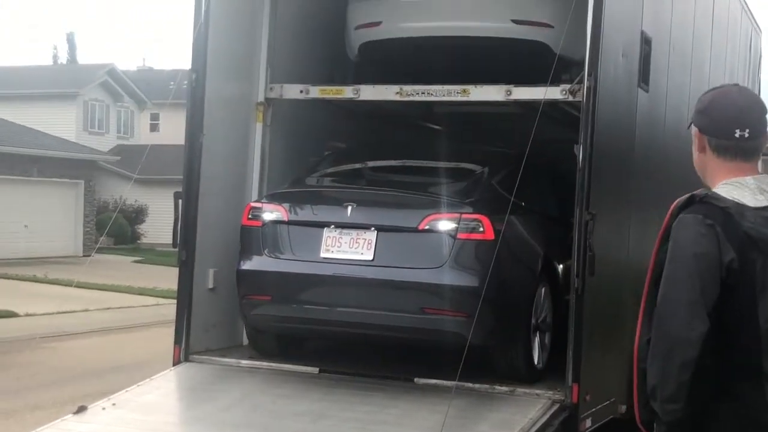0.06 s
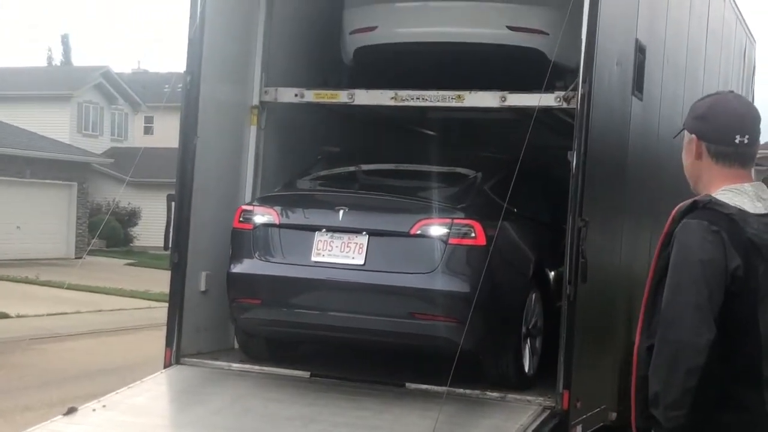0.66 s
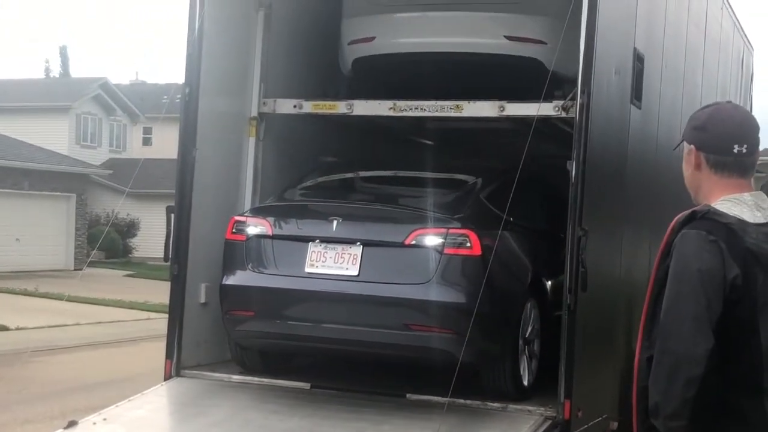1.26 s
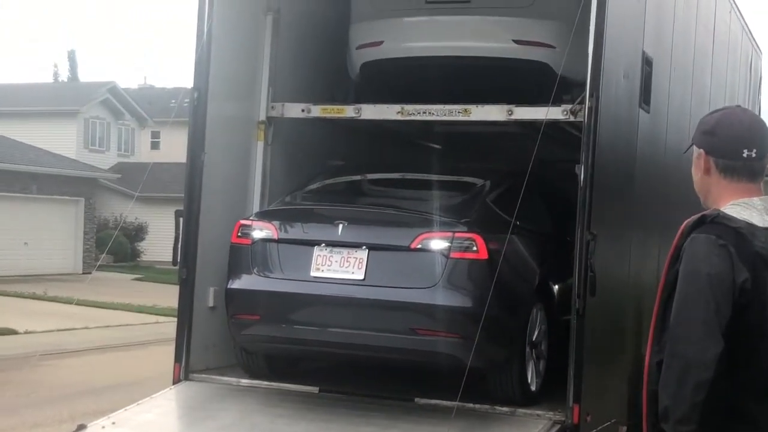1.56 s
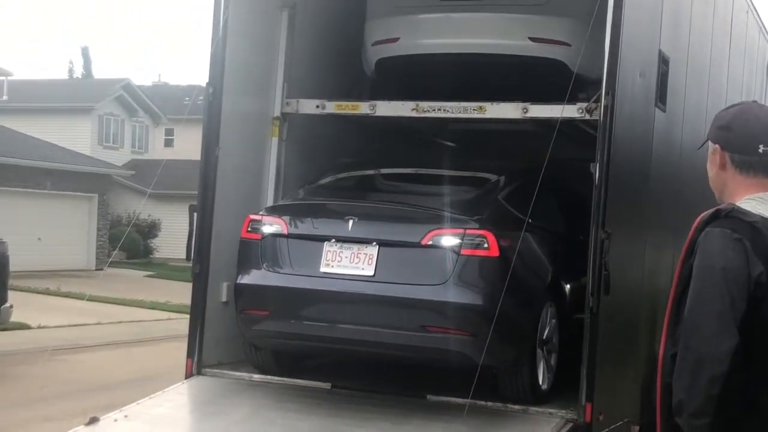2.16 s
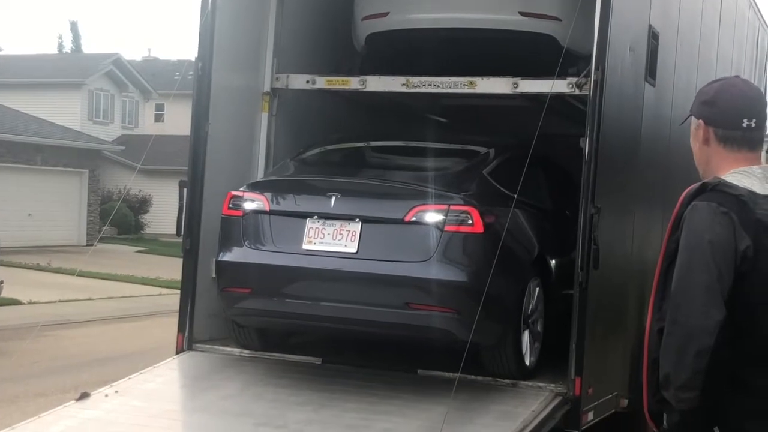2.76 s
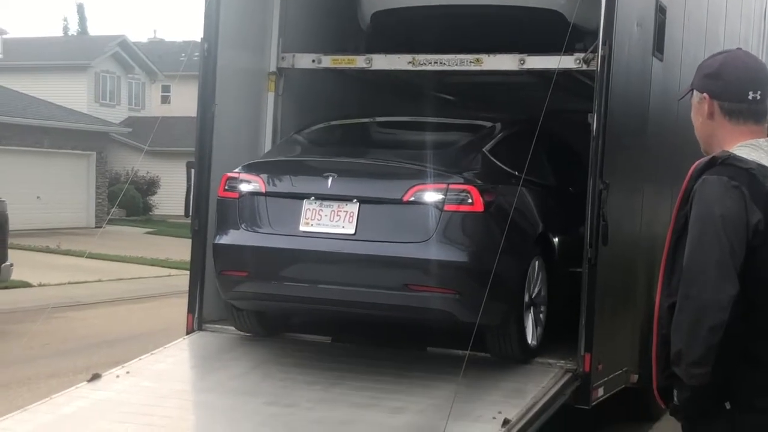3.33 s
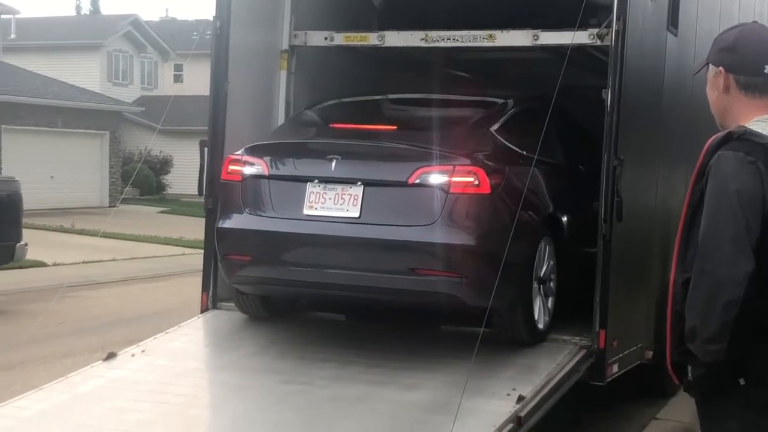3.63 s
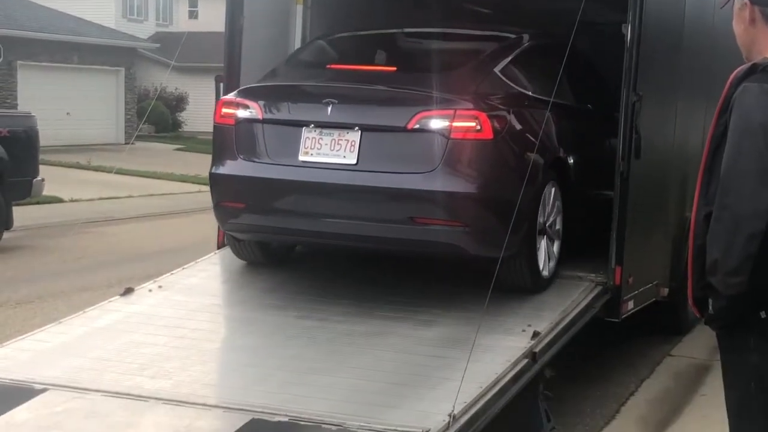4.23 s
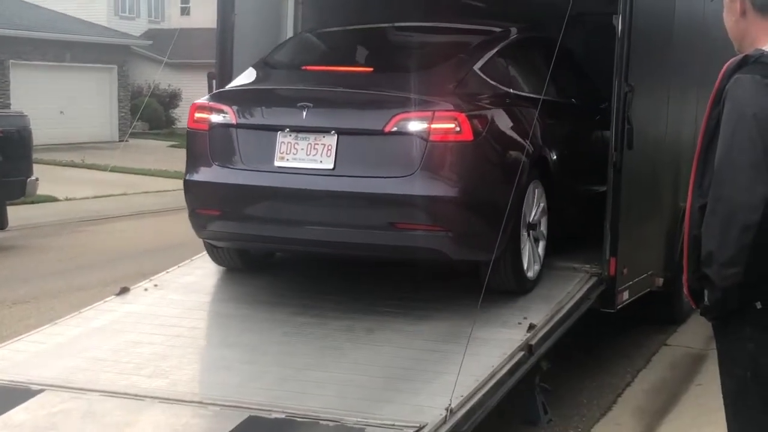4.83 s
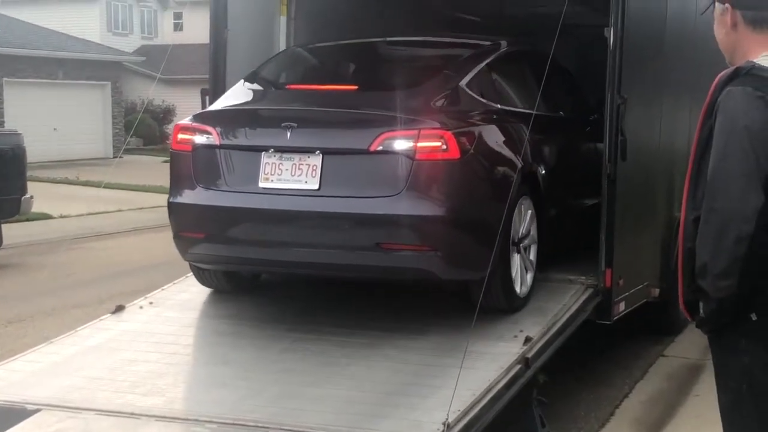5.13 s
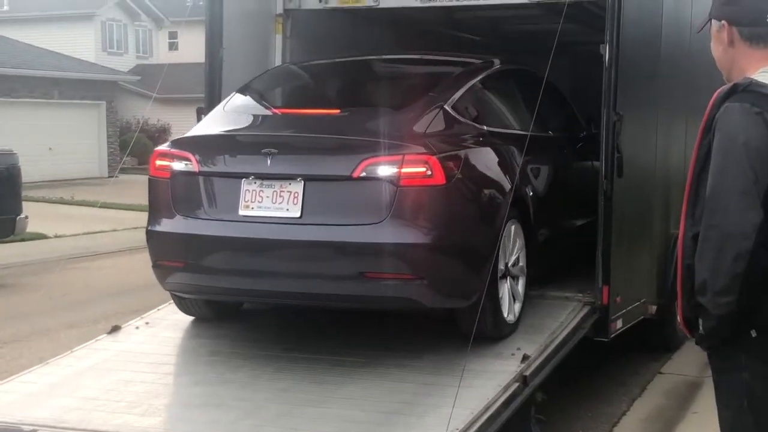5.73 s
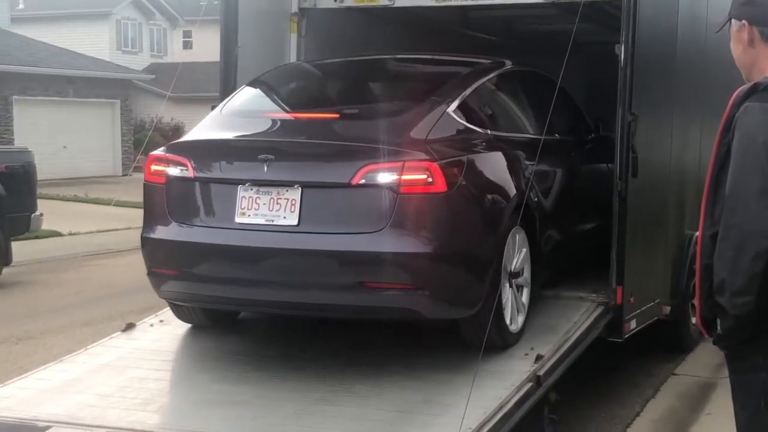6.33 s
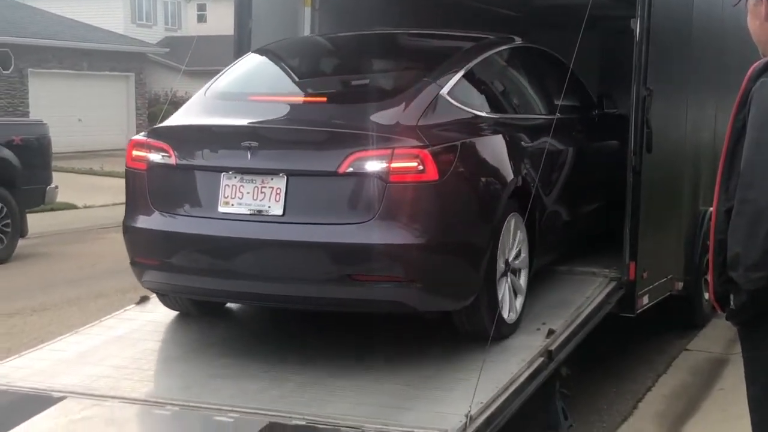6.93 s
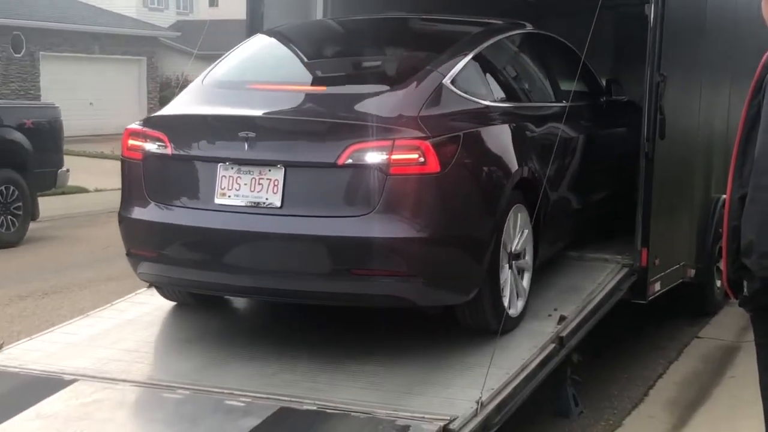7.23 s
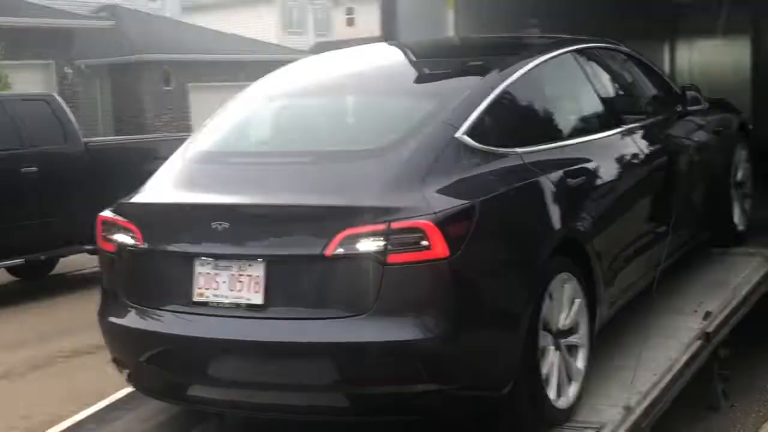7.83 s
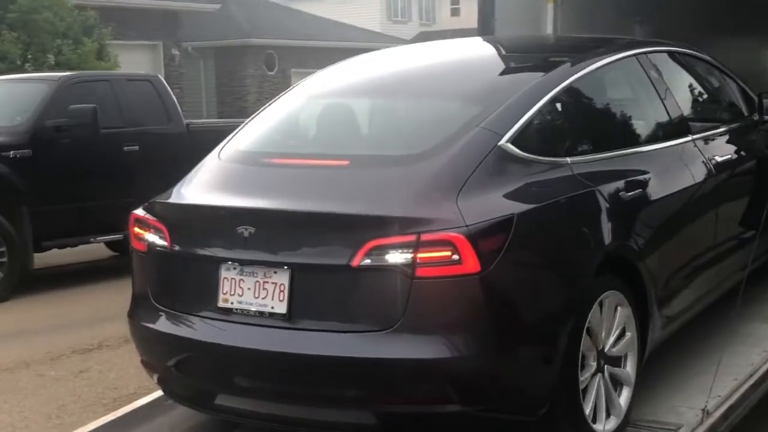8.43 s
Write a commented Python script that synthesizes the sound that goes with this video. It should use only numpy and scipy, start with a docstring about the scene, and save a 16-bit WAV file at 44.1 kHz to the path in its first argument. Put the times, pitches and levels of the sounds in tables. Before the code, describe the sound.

Heard from beside an open trailer, soft creaks, ticks and rubber scuffs give way to sharp clanks of steel fittings as a car rolls onto the metal ramp. The panels crack and pop loudly at irregular moments, each with a short hollow ring. The snaps thin out, and a last clank and some scuffs follow. Low rolling rumble, a very faint electric whine and distant traffic lie underneath.

```python
"""On a quiet street, an electric car backs slowly out of an enclosed trailer and down its metal ramp.
Under the load the ramp's panels slip and snap, the deck flexes with dull thuds and steel fittings clank:
each impact excites modes that decay exponentially. Friction makes the floor creak and the tyres scuff
and squeak, while rolling contact rumbles on the deck and pops grit. The hollow trailer reverberates
after every blow, over the faint whine of the drive and the murmur of distant traffic."""
import sys
import numpy as np
from scipy import signal
from scipy.fft import rfft, irfft
from scipy.io import wavfile
from scipy.ndimage import map_coordinates

SR = 44100
rng = np.random.default_rng(int(sys.argv[2]) if len(sys.argv) > 2 else 0)


def unload_audio(sound):
    """Save the sound as a 16-bit wav file, at the path given as the first command line argument."""
    columns = np.transpose(np.atleast_2d(sound))
    # keep every value between -1 and 1, then stretch to whole-number steps
    steps = np.round(np.clip(columns, -1, 1) * 32767)
    wavfile.write(sys.argv[1], SR, steps.astype(np.int16))


N = 382788
T = np.arange(int(.7 * SR)) / SR  # time axis of one event, t/s
HZ, SCENE_HZ = np.fft.rfftfreq(len(T), 1 / SR), np.fft.rfftfreq(N, 1 / SR)


# Snaps of the ramp: t/s, level/dB, relative crack level/dB, treble shelf/dB, resonance f/Hz
RAMP_SNAPS = [(4.1134, -20.5, -5, -1, 2430), (4.3283, -13.5, 3, -8.5, 2860), (4.4176, -12, -3, 1, 3140),
              (4.4875, -13.5, -6, 3, 2500), (4.7401, -13, 4, 0.5, 2910), (4.8689, -12, -1, 6, 1710),
              (4.935, -14.5, -6.5, 0, 2720), (5.181, -14.5, 0, 4, 2300), (5.2956, -14, -4, 9.5, 2490),
              (5.3928, -18.5, -5, -5, 2350), (5.6486, -14, -2, 5, 3020), (5.9712, -18.5, -22, 0.5, 2300),
              (6.2503, -17, -6, -0.5, 2730), (6.4156, -15, -6.5, -1.5, 2530), (6.582, -14.5, -3, 0, 2620),
              (7.3026, -16, 2.5, 9, 6840), (7.3762, -15, 0, 2, 3530), (7.5103, -21.5, -3, 5.5, 2520),
              (7.5312, -23, 2, 0, 1250)]
# Spectral envelope of a panel: f/Hz, level/dB
PANEL_SPECTRUM = [(88, -56), (150, -6.5), (264, 1), (494, -4), (1340, -1), (1630, -1.5), (1940, -3),
                  (3100, -2.5), (5910, -7.5), (7470, -16), (8730, -12.5), (11500, -22.5), (14500, -27),
                  (16000, -31)]
# Resonances of a panel: f/Hz, bandwidth/Hz, weight/dB
PANEL_RESONANCES = [(1520, 60, -7), (2880, 810, -5), (3600, 79, 5), (4220, 24, -25), (4540, 150, 10),
                    (5170, 170, -20), (5690, 130, 3), (6230, 110, -23), (8000, 95, -16), (8840, 240, 2),
                    (10500, 230, 5), (10600, 160, -3)]
# Decay time of a panel: f/Hz, T60/s
PANEL_T60 = [(200, 0.38), (600, 0.22), (1500, 0.097), (3000, 0.18), (6000, 0.095), (12000, 0.082)]

def snaps():
    """Impulsive excitation: a loaded panel slips with a crack, the plate rings and the deck booms."""
    out = np.zeros(N)
    spot_db, ring_db, boom_db = 8.5, -12.5, -31
    modes = sum(amp(db / 2) * resonance(hz, width) for hz, width, db in PANEL_RESONANCES)
    plate = amp(along(PANEL_SPECTRUM, HZ)) * (1 + 0.29 * modes)
    for s, db, crack_db, treble_db, hz in RAMP_SNAPS:
        bass_shelf = amp((-2 + 0.042 * crack_db) / (1 + (HZ / 1200) ** 4))
        colour = plate * treble(treble_db) * bass_shelf
        high_pass = HZ ** 2 / (HZ ** 2 + 1300 ** 2)
        crack = noise(colour * spot(hz, spot_db) * high_pass) * fade(t60=0.021, rise=0.0013)
        # the ring spreads through the whole plate, so the spot's own resonance matters less
        ring = ringing(colour * spot(hz, .5 * spot_db), PANEL_T60, rise_cycles=1.4)
        boom = noise(resonance(307, 134)) * fade(t60=0.21, rise=0.014)
        add(out, s, amp(db) * (amp(crack_db) * crack + amp(ring_db) * ring + amp(boom_db) * boom))
    return out


# Steel impacts: t/s, level/dB, treble shelf/dB, relative rattle level/dB, resonance f/Hz, boost/dB
FITTING_CLANKS = [(3.1887, -13.5, 4.5, -22.5, 3130, 13), (3.4137, -13.5, 4.5, -12.5, 3850, 10),
                  (3.461, -16, 9, -14.5, 3880, 15), (3.478, -20.5, 1, -10.5, 4400, -6),
                  (3.5659, -19.5, 3, -14, 3650, 10), (8.2815, -16.5, -1.5, -22, 1740, 22),
                  (8.3395, -26.5, -10, -15.5, 4500, 2)]
# Normal modes of a fitting: f/Hz, level/dB, T60/s
STEEL_MODES = [(1105, -5.5, 0.097), (1546, 1, 0.041), (3985, 7.5, 0.012), (4260, 1, 0.091),
               (4900, -18, .04), (5930, -4, .07), (7800, -17, .08), (8650, -2, .07), (10060, -21, 0.055)]
# Spectrum of steel striking steel: f/Hz, level/dB
CLASH_SPECTRUM = [(180, -57), (300, -25), (574, -3), (961, -22), (1120, -6), (1300, -9.5), (2280, -6.5),
                  (3950, -2), (5160, -3), (8790, -7), (16000, -17.5)]

def clanks():
    """Impact and rebound: steel meets steel and chatters twice, each contact exciting damped modes."""
    out = np.zeros(N)
    contact = amp(along(CLASH_SPECTRUM, HZ))
    for s, db, treble_db, rattle_db, hz, boost_db in FITTING_CLANKS:
        colour = contact * treble(treble_db) * spot(hz, boost_db, ripple_db=5.5)
        for delay, bounce_db in [(0, 1.5), (.004, -5.5), (.0098, -6.5)]:
            strengths = amp(rng.normal(0, 2, len(STEEL_MODES)))
            ring = np.zeros(len(T))
            for strength, (mode_hz, mode_db, t60) in zip(strengths, STEEL_MODES):
                mode = np.sin(2 * np.pi * (mode_hz * T + rng.random()))
                ring += strength * amp(mode_db) * fade(t60, rise=.0002) * mode
            clash = noise(colour) * fade(t60=0.024, rise=0.00019)
            rattle_colour = contact * treble(treble_db + 1.5) * spot(hz, .5 * boost_db)
            rattle = noise(rattle_colour) * fade(t60=0.17, rise=0.0015)
            blow = amp(-7.5) * (clash + amp(rattle_db) * rattle) + amp(rattle_db - 7) * ring
            add(out, s + delay, amp(db + bounce_db) * blow)
    return out


# Light taps on the panels: t/s, level/dB, resonance f/Hz; most come from loose fittings, while those at 5.9641
# and 6.5744 s are slight slips leading into the snaps just after
LIGHT_TICKS = [(1.2853, -37, 7500), (2.8754, -28.5, 2540), (2.9701, -30, 5000), (3.0707, -33, 5560),
               (3.315, -35.5, 4200), (3.7342, -28.5, 2100), (5.9641, -26, 2400), (6.379, -28.5, 4300),
               (6.5744, -30, 2520), (7.716, -39, 2150), (8.384, -30, 4580), (8.5328, -31.5, 4330),
               (8.599, -29.5, 2680)]

def ticks():
    """Light impacts: loose fittings tap the panels, and a panel slips slightly just before some snaps."""
    out = np.zeros(N)
    for s, db, hz in LIGHT_TICKS:
        add(out, s, tick(db, hz))
    return out


def tick(db, hz):
    """Two-stage decay: a brief contact on a panel leaves a weak tail; higher ticks are brighter."""
    place = spot(hz, boost_db=7, sharpness=4)
    shelf = treble(9 + 10.5 * np.log2(hz / 3000))
    contact = noise(amp(along(PANEL_SPECTRUM, HZ)) * shelf * place)
    envelope = fade(t60=0.021, rise=0.00026) + 0.34 * fade(t60=0.19, rise=0.0026)
    return amp(db - 9) * contact * envelope


# Thuds of the deck: t/s, level/dB, T60/s, resonance f/Hz, boost/dB
DECK_THUDS = [(1.287, -52.5, 0.33, 794, 8), (2.877, -40.5, 0.21, 413, 25), (3.19, -44.5, .15, 550, 28),
              (3.57, -51, 0.39, 160, 10), (5.783, -34, 0.37, 480, 5), (7.009, -48, 0.37, 600, -3),
              (7.238, -36.5, .2, 290, 9), (7.999, -49, 0.36, 200, 8), (8.598, -45.5, 0.31, 262, 7)]
# Spectrum of the flexing deck: f/Hz, level/dB
DECK_SPECTRUM = [(35, -49), (60, -7.5), (189, 5.5), (371, 1.5), (504, -7.5), (714, 0.5), (877, -12.5),
                 (1270, -20), (1620, -22), (2290, -19.5), (2590, -20.5), (4070, -30.5), (8000, -29.5),
                 (10400, -39), (17600, -120)]

def thuds():
    """Plate flexure: the deck gives under a wheel; a stiffer spot sounds higher, clearer and brighter."""
    out = np.zeros(N)
    for s, db, t60, hz, boost_db in DECK_THUDS:
        tilt = 0.25 * boost_db + 2 * np.log2(hz / 500)
        thud = soft_contact(DECK_SPECTRUM, tilt, hz, boost_db, rise=0.032 * t60, t60=t60)
        add(out, s, amp(db) * thud)
    return out


# Scuffs of the tyres: t/s, level/dB, spectral tilt/(dB per octave), resonance f/Hz
TYRE_SCUFFS = [(.59, -67, 0, 4430), (.832, -61, -1.5, 2980), (1.165, -55.5, 2, 8450),
               (1.286, -49.5, 0, 8600), (1.58, -63.5, 7, 8000), (2.12, -64.5, 5, 6000),
               (2.511, -58, 0, 2720), (2.725, -48.5, 0.5, 2750), (2.874, -49, 0.5, 2290),
               (2.968, -48, 3.5, 1630), (5.783, -39, 0.5, 720), (7.89, -52, 4, 4540),
               (7.962, -41.5, 5, 5660), (8.1, -50.5, 3.5, 4500), (8.37, -55, -1, 4400),
               (8.534, -46, 3, 4280), (8.598, -49, -2, 1260)]
# Spectrum of sliding rubber: f/Hz, level/dB
RUBBER_SPECTRUM = [(240, -13), (400, 10), (616, 5), (742, -1), (979, 5), (1230, 1), (2220, -4.5),
                   (2550, -3), (4800, -7), (9760, -15), (16000, -22.5)]

def scuffs():
    """Sliding friction: the tread drags over the deck in short, grainy strokes."""
    out = np.zeros(N)
    for s, db, tilt, hz in TYRE_SCUFFS:
        stroke = soft_contact(RUBBER_SPECTRUM, tilt, hz, boost_db=7, rise=0.0036, t60=0.5)
        add(out, s, amp(db) * stroke)
    return out * amp(0.86 * wobble(200))


# Creaks of the trailer floor: t/s, duration/s, level/dB
FLOOR_CREAKS = [(0.129, .33, -46), (0.908, .14, -47.5)]

def creaks(slips_per_s=32, centre_hz=4000):
    """Stick-slip friction: the floor yields in an uneven run of ticks that swells and fades."""
    out = np.zeros(N)
    for s, length, db in FLOOR_CREAKS:
        slips = max(round(length * slips_per_s), 1)
        for k, (late, size, pitch) in enumerate(rng.uniform(-.5, .5, (slips, 3))):
            progress = (k + .5 + .8 * late) / slips
            slip = tick(db + 8 * size, centre_hz * 2 ** (.5 * pitch))
            add(out, s + progress * length, np.sqrt(np.sin(np.pi * progress)) * slip)
    return out


# Squeaks of the tyres: t/s, level/dB, centre f/Hz
TYRE_SQUEAKS = [(6.738, -50.5, 2370), (7.0, -51, 1537), (7.078, -49.5, 1314), (7.951, -50, 1494),
                (8.261, -48, 1310)]

def squeaks(length_s=0.031, pitch_fall=0.044):
    """Stick-slip oscillation: rubber grips and lets go in a short, rough, slightly falling chirp."""
    out = np.zeros(N)
    progress = np.clip(T / length_s, 0, 1)
    for s, db, hz in TYRE_SQUEAKS:
        jitter = .055 * wobble(500)[:len(T)]
        pitch = hz * (1 - pitch_fall * (progress - .5) + jitter)
        chirp = np.sin(2 * np.pi * np.cumsum(pitch) / SR)
        add(out, s, amp(db + 2) * np.sin(np.pi * progress) * chirp)
    return out


# Rolling through the trailer and onto the ramp: t/s, rumble level/dB, tread level/dB
ROLL_LEVELS = [(0, -65, -76), (.4, -62.5, -75), (2.55, -64, -73), (2.8, -57.5, -58.5), (3.3, -62, -64),
               (3.62, -58, -55), (3.85, -56, -60.5), (4.55, -59.5, -60), (5.25, -51, -55.5),
               (5.65, -57.5, -59.5), (6.1, -55.5, -62.5), (6.55, -52.5, -54.5), (6.85, -54.5, -64.5),
               (7.4, -50.5, -64), (7.75, -56.5, -62.5), (8.68, -51, -57)]
# Spectrum of the deck's rumble: f/Hz, level/dB
RUMBLE_SPECTRUM = [(15, -57), (25, -33), (64, -3.5), (165, 2), (257, 0), (357, -5.5), (398, -6.5),
                   (496, -10), (654, -7.5), (716, -9.5), (830, -9), (961, -10), (2000, -21), (2600, -38),
                   (4400, -120)]
# Spectrum of the tread noise: f/Hz, level/dB
TREAD_SPECTRUM = [(470, -15), (800, -6), (1210, -5.5), (2440, -3.5), (2870, -3), (4340, -6.5), (7640, -14),
                  (10300, -22), (15000, -13.5), (16000, -27)]

def rolling():
    """Forced vibration: the tyres drum on the hollow deck while the tread crackles over grit."""
    rumble_db, tread_db = curves(ROLL_LEVELS)
    rumble = amp(rumble_db + 1.9 * wobble(12)) * steady_noise(RUMBLE_SPECTRUM)
    crackle = unit(steady_noise(TREAD_SPECTRUM) * amp(1.5 * wobble(350) + 2.04 * wobble(22)))
    return rumble + amp(tread_db) * crackle


def grit(count=45):
    """Shot noise: single grains pop under the tread at random times, louder as it bites harder."""
    out = np.zeros(N)
    for s, size_db, octaves in rng.random((count, 3)) * [N / SR, 9, 1.5]:
        pop = noise(resonance(3500 * 2 ** octaves, 4800)) * fade(t60=0.028, rise=0.00027)
        add(out, s, amp(size_db) * pop)
    _, tread_db = curves(ROLL_LEVELS)
    return out * amp(tread_db + 5.5)


# Reverberation time of the trailer: f/Hz, T60/s
TRAILER_T60 = [(120, 0.26), (300, 0.42), (1000, 0.55), (3000, 0.44), (6000, 0.65), (13000, 0.18)]
# Spectrum of its reverberation: f/Hz, level/dB
TRAILER_SPECTRUM = [(100, 2), (270, 1.5), (600, -7.5), (1500, -8.5), (4000, -10.5), (8000, -9.5),
                    (15000, -23)]

def trailer(x, delay_s=.009):
    """Reverberation: the long box booms; as the car moves, each quarter second gets a new random tail."""
    out = np.zeros(N)
    hop = SR // 4
    for start in range(0, N, hop):
        tail = ringing(np.ones(len(HZ)), TRAILER_T60, rise_cycles=7.1)
        tail /= np.linalg.norm(tail)
        tail = irfft(rfft(tail) * amp(along(TRAILER_SPECTRUM, HZ)), len(T))
        add(out, start / SR + delay_s, signal.fftconvolve(x[start:start + hop], tail[:-SR // 10]))
    return out


# Bands of the inverter's whine: f/Hz, bandwidth/Hz, level/dB
WHINE_BANDS = [(5620, 71, -80.5), (10270, 2900, -72.5)]
# Course of the whine: t/s, gain/dB
WHINE_GAIN = [(0, -7.5), (1.4, -6.5), (2.1, -1), (4, 5), (7, 3.5), (8.68, 2.5)]

def drive():
    """Band-limited noise: the inverter sings faintly in one narrow and one broad band of hiss."""
    bands = sum(amp(db) * noise(resonance(hz, width, SCENE_HZ), N) for hz, width, db in WHINE_BANDS)
    return bands * amp(curves(WHINE_GAIN)[0])


# Spectrum of distant traffic: f/Hz, level/dB
TRAFFIC_SPECTRUM = [(15, -47), (25, -20), (43, -3.5), (130, 0), (175, -5.5), (212, -19), (326, -14),
                    (394, -19), (775, -8), (1520, -18.5), (2760, -30), (5570, -24), (8140, -39),
                    (9840, -40), (16000, -45)]

def street():
    """Ambient noise: distant traffic murmurs between the houses, its level drifting gently."""
    return amp(-61 + 0.62 * wobble(2.62)) * steady_noise(TRAFFIC_SPECTRUM)


def soft_contact(spectrum, tilt, hz, boost_db, rise, t60):
    """Source and filter: coloured noise swells and decays; tilt is in dB per octave."""
    colour = amp(along(spectrum, HZ) + tilt * np.log2(HZ / 1000 + .1))
    place = spot(hz, boost_db, ripple_db=3.2, sharpness=4.4)
    envelope = fade(t60, rise)
    return noise(colour * place) * envelope / envelope.max()


def spot(hz, boost_db, ripple_db=3, sharpness=7, spacing_hz=130):
    """Modal coupling: each spot of the metal weights one resonance and a chance mix of the others."""
    ripple = map_coordinates(rng.standard_normal(1000), [HZ / spacing_hz], mode="mirror")
    peak = resonance(hz, width=hz / sharpness + 50)
    return amp(ripple_db * ripple) * (1 + (amp(boost_db) - 1) * peak)


def ringing(gain, t60s, rise_cycles):
    """Modal overlap: dense modes merge into noise; each octave builds and dies at its own rate."""
    centres = np.geomspace(62.5, 16000, 9)
    spectrum = rfft(noise(gain))
    bands = [along(np.c_[centres, weights], HZ) for weights in np.eye(len(centres))]
    octaves = [irfft(spectrum * band, len(T)) for band in bands]
    return sum(x * fade(along(t60s, hz), rise_cycles / hz) for x, hz in zip(octaves, centres))


def resonance(hz, width, f=HZ):
    """Lorentzian curve: the bell-shaped gain of one resonance."""
    return 1 / (1 + ((f - hz) / (width / 2)) ** 2)


def treble(db):
    """Shelving filter: a gain of db on the octaves above 6500 Hz."""
    return amp(db * HZ ** 4 / (HZ ** 4 + 6500 ** 4))


def fade(t60, rise):
    """Exponential damping: after the rise, the level falls 60 dB in t60 seconds."""
    return np.exp(-np.log(1000) * T / t60) * (1 - np.exp(-T / rise))


def noise(gain, size=len(T)):
    """Spectral shaping: noise of rms 1 with the given gain per frequency."""
    return unit(irfft(rfft(rng.standard_normal(size)) * gain, size))


def steady_noise(spectrum):
    """Stationary noise: scene-long, with an (f/Hz, level/dB) spectrum."""
    return noise(amp(along(spectrum, SCENE_HZ)), N)


def wobble(rate):
    """Spline interpolation: a smooth random curve, rate knots a second."""
    knots = rng.standard_normal(int(N * rate / SR) + 4)
    return map_coordinates(knots, [np.arange(N) * rate / SR])


def curves(rows):
    """Linear interpolation: one value per sample for each column after the time."""
    times, *columns = np.transpose(rows)
    return [np.interp(np.arange(N) / SR, times, column) for column in columns]


def along(points, hz):
    """Interpolation of (f/Hz, value) points on a logarithmic frequency axis."""
    f, values = np.transpose(points)
    return np.interp(np.log(hz + 1), np.log(f + 1), values)


def amp(db):
    """Amplitude ratio of a level in decibels."""
    return 10 ** (np.asarray(db) / 20)


def unit(x):
    """Normalisation to rms 1."""
    return x / np.sqrt(np.mean(x ** 2) + 1e-20)


def add(track, s, x):
    """Superposition: x joins the track at s seconds."""
    part = track[max(round(s * SR), 0):][:len(x)]
    part += x[:len(part)]


def scene():
    """Direct and reverberant sound: ramp, fittings and tyres add up in front of the open trailer."""
    panels, steel = snaps(), clanks()
    small = ticks() + creaks() + squeaks() + grit()
    soft = thuds() + scuffs()
    echo = trailer(amp(-7.5) * panels + steel + amp(-6) * (small + soft))
    return (panels + steel + small + soft + echo + rolling() + drive() + street())[None]


def record(dry):
    """Band-pass filtering: the deepest bass and the highest treble are removed."""
    bottom_hz, top_hz = 30, 16000
    low_cut = SCENE_HZ ** 4 / (SCENE_HZ ** 4 + bottom_hz ** 4)
    high_cut = np.clip((top_hz - SCENE_HZ) / 500 + .5, 0, 1)
    return irfft(rfft(dry) * low_cut * high_cut, N)


dry = scene()
out = record(dry)
unload_audio(out)
```